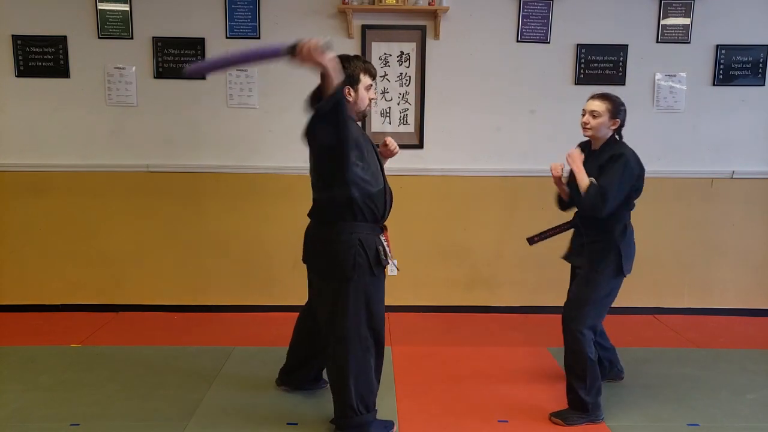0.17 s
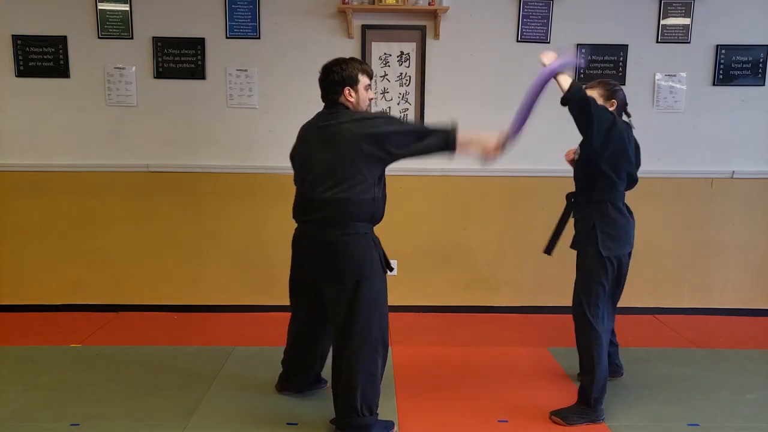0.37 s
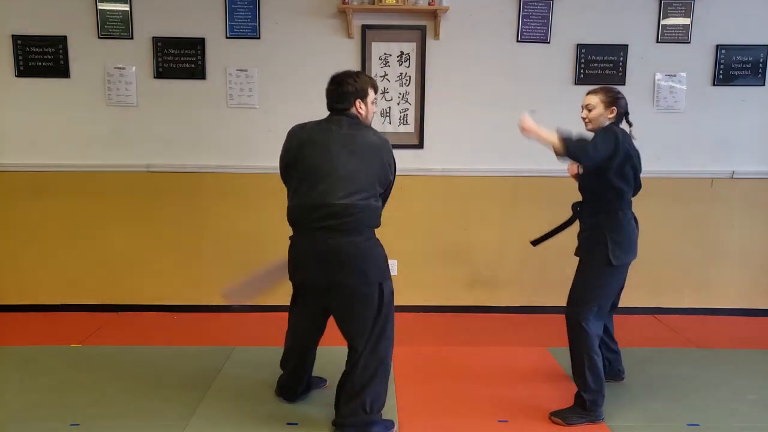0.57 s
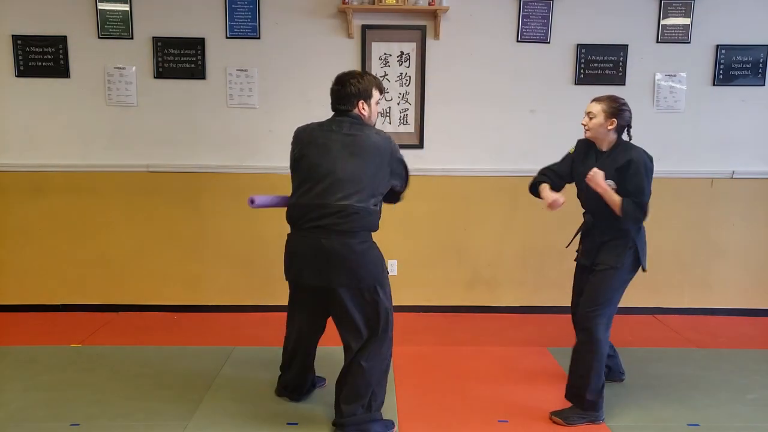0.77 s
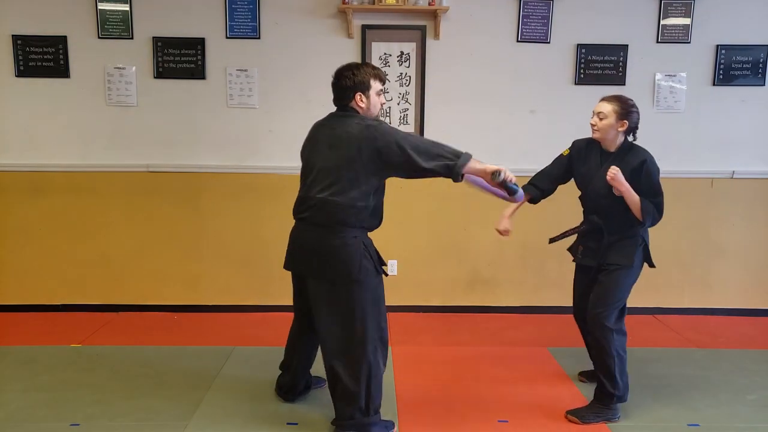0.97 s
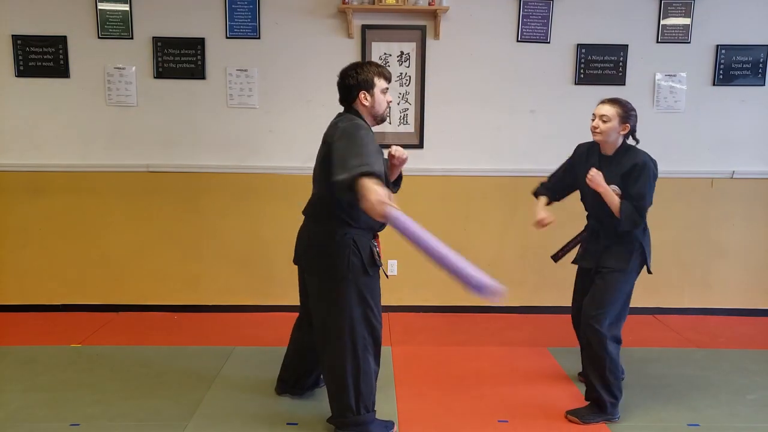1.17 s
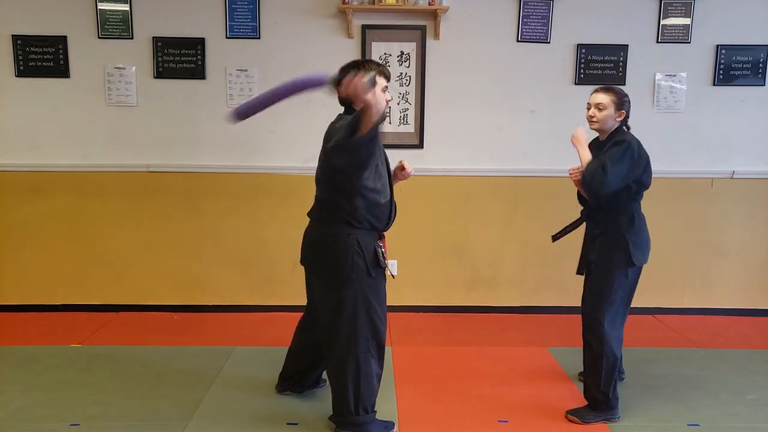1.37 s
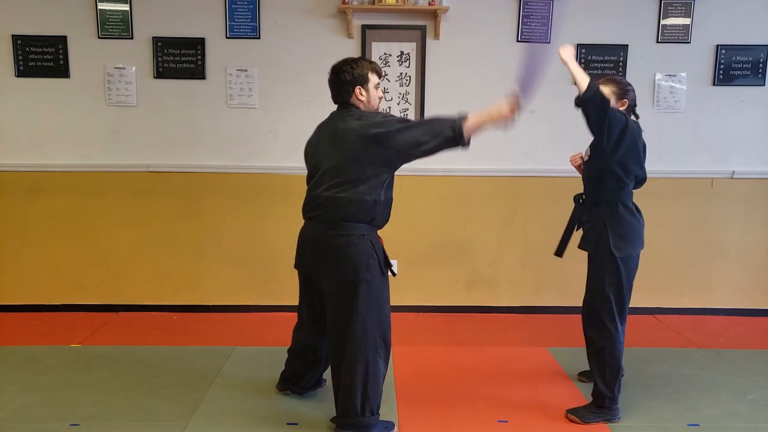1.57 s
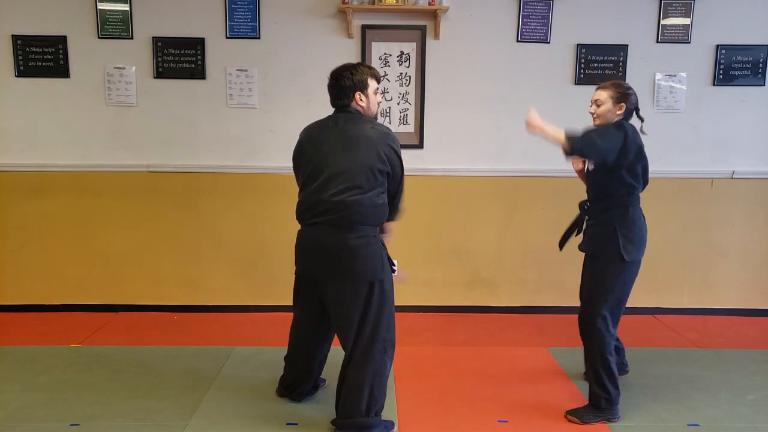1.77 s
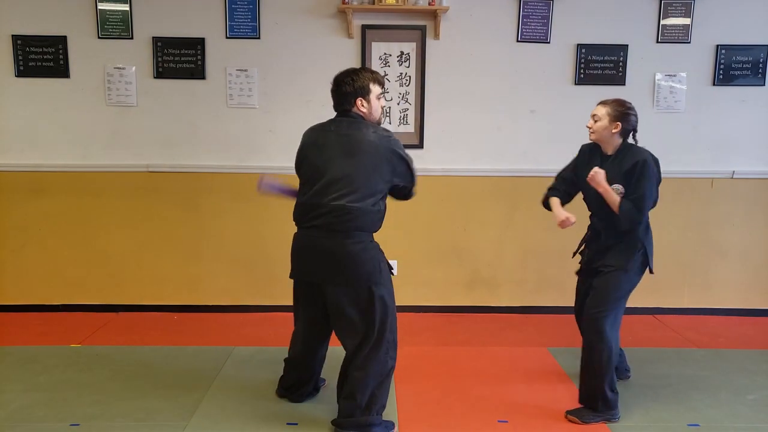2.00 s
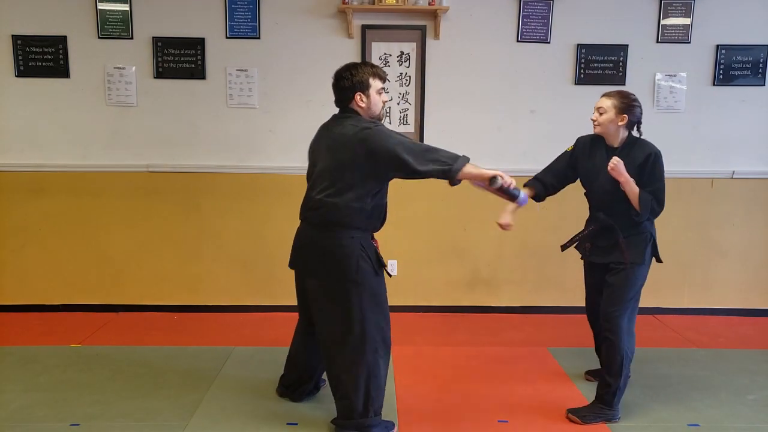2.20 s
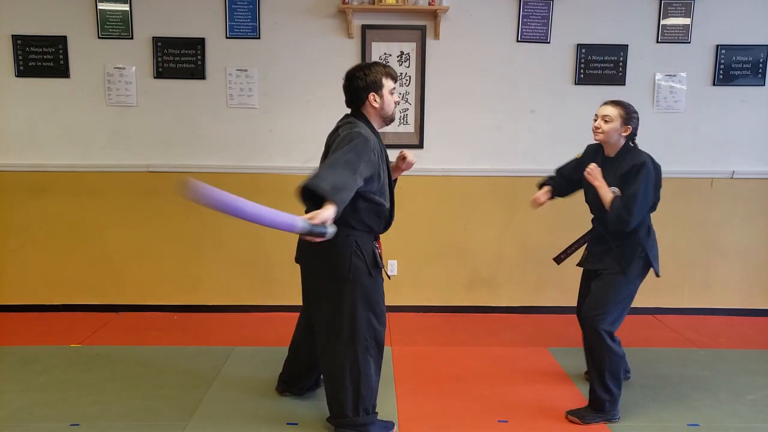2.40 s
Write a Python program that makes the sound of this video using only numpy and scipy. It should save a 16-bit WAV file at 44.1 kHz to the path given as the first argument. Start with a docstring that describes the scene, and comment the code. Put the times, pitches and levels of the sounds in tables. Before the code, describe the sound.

Sharp, hollow smacks of a foam tube on sleeved forearms, with soft swishes and room echo

```python
"""A foam noodle smacks blocking forearms in a large matted training room, a few metres from the microphones.
The tail of a first smack opens over steady hiss and a wavering rumble; sleeve and noodle swish between
blows. A smack at half a second leads to two light taps, then come a smack, a tap, two quick smacks and
a last one. Each is a filtered click for the crack and decaying sines for the short hollow thud, thrown
back by echoes and a noise-made room; the swishes are grainy noise bursts."""
import sys
import numpy as np
from scipy import signal
from scipy.fft import rfft, irfft
from scipy.io import wavfile
from scipy.ndimage import uniform_filter1d

SR = 44100
rng = np.random.default_rng(int(sys.argv[2]) if len(sys.argv) > 2 else 0)


def generate_wav(sig):
    """Save sig (samples, or channels by samples) to the path in sys.argv[1] as 16-bit PCM at SR."""
    pcm = np.round(np.clip(np.atleast_2d(sig).T, -1, 1) * 32767).astype(np.int16)
    wavfile.write(sys.argv[1], SR, pcm)


def voltage_ratio(level):
    """Linear amplitude factor for a level in decibels (scalar or array-like)."""
    return 10 ** (np.asarray(level, float) / 20)


N = 107736  # length in samples


def evened(x):
    """Scales a sound to an rms of one."""
    return x / np.sqrt(np.mean(x ** 2) + 1e-20)


def read(points, hz):
    """Reads a curve of (Hz, value) points, straight between them on a log frequency axis."""
    f, value = np.transpose(points)
    return np.interp(np.log(hz + 1), np.log(f + 1), value)


def shaped(x, gain):
    """Filters x by a gain that is a function of Hz."""
    spectrum = rfft(x) * gain(np.fft.rfftfreq(x.shape[-1], 1 / SR))
    return irfft(spectrum, x.shape[-1])


def paired(a, b):
    """Mixes two independent noises into left and right, alike in the bass and the top, looser between."""
    # Likeness of left and right. Each row: frequency in Hz, left-right correlation.
    likeness = [(60, .98), (150, .98), (380, .88), (950, .45), (2400, .1), (5000, -.25), (7300, -.25),
                (8000, .87), (11000, .75), (15000, .5)]

    def shared(hz):
        return np.clip(read(likeness, hz), -1, 1)

    right = shaped(a, shared) + shaped(b, lambda hz: np.sqrt(1 - shared(hz) ** 2))
    return np.array([a, right])


def floor():
    """Steady room noise and hiss, and a low rumble that wavers as feet shift on the mats."""
    # Spectrum of room noise and hiss. Each row: frequency in Hz, relative density in dB per Hz.
    hiss_curve = [(15, -4), (30, 9.5), (70, -5), (200, -2), (300, -1.5), (370, -15.5), (1000, -25),
                  (3400, -40), (5000, -24.5), (7300, -17.5), (8600, -36.5), (14800, -18), (16500, -26.5),
                  (17000, -51.5)]
    # Swell of the rumble ahead of the microphones' bass cut. Each row: time in seconds, rms level in dB.
    rumble_levels = [(0.0, -48), (0.05, -54), (0.22, -50), (0.49, -43.5), (0.52, -39), (0.67, -26),
                     (0.8, -74), (1.03, -54), (1.11, -27), (1.14, -33), (1.19, -44), (1.71, -64.5),
                     (1.76, -42), (1.81, -33), (1.83, -63), (2.26, -58.5), (2.33, -44.5), (2.44, -43)]
    hiss_db, rumble_hz = -61.5, 68.5  # the rumble's low-pass halves amplitude at rumble_hz
    a, b, c = rng.standard_normal((3, N))
    hiss = evened(shaped(paired(a, b), lambda hz: voltage_ratio(read(hiss_curve, hz))))
    rumble = evened(shaped(c, lambda hz: (hz > 10) / (1 + (hz / rumble_hz) ** 4)))
    rumble_db = np.interp(np.arange(N) / SR, *np.transpose(rumble_levels))
    return voltage_ratio(hiss_db) * hiss + voltage_ratio(rumble_db) * rumble


def causal(db):
    """A minimum-phase click with the spectrum db, which starts at once."""
    log = np.log(voltage_ratio(np.r_[db, db[-2:0:-1]]))
    return np.fft.ifft(np.exp(log - 1j * signal.hilbert(log).imag)).real


def crack(t):
    """The sharp onset of the blow: one click, strongest in the treble."""
    # Spectrum of the crack. Each row: frequency in Hz, relative level in dB.
    crack_curve = [(600, -34.5), (1500, -38), (2500, 5.5), (5000, 19.5), (7500, 16.5), (8600, 5),
                   (11000, 12.5), (15000, 13.5), (16500, -8), (17500, -41)]
    return -causal(read(crack_curve, np.fft.rfftfreq(len(t), 1 / SR)))


def ring(modes, pitch, t):
    """Sum of sine modes that start together and die exponentially."""
    return -sum(voltage_ratio(db - 60 * t / t60) * np.sin(2 * np.pi * hz * pitch * t) for hz, db, t60 in modes)


def thud(pitch, t):
    """Low ring of arm and sleeve."""
    # Modes of the thud. Each row: frequency in Hz at pitch 1, relative level in dB, t60 in seconds.
    thud_modes = [(100, -27, 0.021), (196.8, -3, 0.038), (317, -1, 0.019)]
    return ring(thud_modes, pitch, t)


def slap(t):
    """Higher, very short ring of the foam skin."""
    # Modes of the slap. Each row: frequency in Hz ahead of the pitch factor, relative dB, t60 in seconds.
    slap_modes = [(781, 2, 0.0048), (1042, -4.5, 0.0027), (1329, -1, 0.0057), (1667, 0, 0.0072),
                  (2012, -19.5, 0.012)]
    return ring(slap_modes, 0.9305, t)


def knock(knock_hz, t):
    """Hollow ring of the tube."""
    # Modes of the knock. Each row: multiple of the knock frequency, relative level in dB, t60 in seconds.
    knock_modes = [(1, 0, .035), (1.38, -10, .02)]
    return ring(knock_modes, knock_hz, t)


def spit(t):
    """Squeezed air: two channels of dying noise that smear the crack just after the contact."""
    start_s, t60, level_db = 0.0002, 0.08, -23.5
    noise = rng.standard_normal((2, len(t)))
    return voltage_ratio(level_db - 60 * t / t60) * noise * (t > start_s)


def echoes():
    """First bounces off floor and walls: single taps of random sign, placed apart for each channel."""
    # Bounces. Each row: usual delay in seconds, level in dB.
    bounces = [(.003, 2), (.0072, -4.5), (.0092, -2.5), (0.0149, -6.5), (0.019, -7.5), (.027, -10.5)]
    taps = np.zeros((2, SR))
    for lag, db in bounces:
        for side in taps:
            at = round(lag * rng.uniform(.93, 1.07) * SR)
            side[at] = voltage_ratio(db) * rng.choice([-1, 1])
    return taps


def room():
    """Sparse taps of random sign, each band dying at its own speed; low standing waves stand out."""
    # Decay of the room. Each row: frequency in Hz, t60 in seconds.
    decay = [(80, 0.63), (210, 0.77), (560, 0.44), (1470, 0.4), (3880, 0.55), (10200, 0.41)]
    # Standing waves. Each row: frequency in Hz, width in Hz, boost in dB.
    standing_waves = [(95, 4.7, -1.5), (157, 5.5, 3.5), (199.8, 8, 1.5), (269.4, 6.8, 5.5), (390.4, 34, 1)]
    rise_s, early_db, early_s = 0.0038, 3, 0.022
    taps = np.zeros((2, SR))
    at = np.arange(0, SR - 10, 10) + rng.integers(0, 10, (2, SR // 10 - 1))
    np.put_along_axis(taps, at, rng.choice([-1., 1.], at.shape), 1)
    hz, t, z = signal.stft(taps, SR, nperseg=512)
    dying = z * voltage_ratio(-60 * t / read(decay, hz)[:, None])
    tail = signal.istft(dying, SR, nperseg=512)[1][:, :SR]

    def resonance(f):
        return 1 + sum((voltage_ratio(db) - 1) / (1 + 2j * (f - mode_hz) / width)
                       for mode_hz, width, db in standing_waves)

    tail = shaped(np.pad(tail, ((0, 0), (0, SR))), resonance)[:, :SR]
    s = np.arange(SR) / SR
    rise = 1 - np.exp(-(s / rise_s) ** 2)
    near_walls = voltage_ratio(early_db * np.exp(-s / early_s))  # they crowd the start of the tail
    tail = tail * rise * near_walls
    return tail / np.linalg.norm(tail[0])


def through(x, space):
    """Plays one sound into a two-channel space."""
    return signal.fftconvolve(x[None], paired(*space), axes=1)


def smack(s, crack_db, thud_db, knock_db, slap_db, pitch, knock_hz):
    """A crack, a spit of squeezed air and the short ring of foam and arm, then echoes and room."""
    room_db, echo_crack_db, knock_wet_db = 9, -6, -4
    direct_crack_db, direct_body_db = -7, 1
    t = np.arange(4096) / SR
    click = voltage_ratio(crack_db) * crack(t)
    hollow = voltage_ratio(knock_db) * knock(knock_hz, t)
    body = voltage_ratio(thud_db) * thud(pitch, t) + voltage_ratio(slap_db) * slap(t)
    body = body + voltage_ratio(knock_wet_db) * hollow
    wet = through(click + body, voltage_ratio(room_db) * room())
    wet += through(voltage_ratio(echo_crack_db) * click + body, echoes())
    # the tube beams its knock at the microphones; the arm shades the crack
    direct = voltage_ratio(direct_crack_db) * click + voltage_ratio(direct_body_db) * body + hollow
    wet[:, :len(t)] += direct + through(click, spit(t))[:, :len(t)]
    lead = SR // 5  # room for a blow that lands before the start
    out = np.zeros((2, N + lead + 2 * SR))
    at = lead + round(s * SR)
    out[:, at:at + wet.shape[1]] = wet
    return out[:, lead:lead + N]


def swishes():
    """Grainy bursts of cloth and air noise that swell, pass and hang in the room."""
    # Swishes of sleeve and noodle. Each row: peak in seconds, rise in seconds, level in dB,
    # brightness in dB per octave.
    swish_rows = [(.2, 0.067, -67.5, -2), (.39, 0.18, -72, -3), (.52, 0.017, -57.5, 10),
                  (0.747, 0.034, -44, -3), (.88, 0.063, -43.5, -6), (0.929, 0.05, -60, -2.5),
                  (1.04, 0.037, -58, -4.5), (1.074, 0.044, -56.5, 1), (1.299, 0.16, -69, 11.5),
                  (1.498, 0.057, -67, 12.5), (1.741, 0.077, -72, 0), (2.028, 0.015, -88, -26),
                  (2.158, 0.044, -52, -4.5), (2.32, 0.023, -65.5, 3)]
    # Their common spectrum. Each row: frequency in Hz, relative density in dB per Hz.
    swish_curve = [(180, -33), (300, -18), (877, -11.5), (1150, -10), (1770, -16.5), (6780, -12),
                   (8440, -20.5), (15200, -15.5), (16500, -39)]
    grain_db, wet_db = 0.5, -2
    t, out = np.arange(N) / SR, np.zeros(N)
    for s, rise, db, tilt_db in swish_rows:
        def colour(hz):
            return voltage_ratio(read(swish_curve, hz) + tilt_db * np.log2((hz + 1) / 2000))

        noise = shaped(rng.standard_normal(N), colour)
        grain = voltage_ratio(grain_db * evened(uniform_filter1d(rng.standard_normal(N), 150)))
        swell = np.exp(-((t - s) / rise) ** 2)
        out += voltage_ratio(db) * swell * evened(noise * grain)
    return out + voltage_ratio(wet_db) * through(out, room())[:, :N]


def scene():
    """Smacks, light taps and swishes over the noise of the room."""
    # Smacks of the noodle on forearms. Each row: start in seconds, then crack, thud, hollow knock and slap
    # in relative dB, thud pitch (1 = usual), knock frequency in Hz.
    smack_rows = [(-.07, -20.5, -19.5, -27.5, -19.5, 0.78, 430), (0.53, -21, -21.5, -23.5, -20, 1.274, 430),
                  (1.0966, -22.5, -19.5, -26.5, -21, 1.11, 423),
                  (1.76, -24.5, -26.5, -20, -23.5, 1.12, 528), (1.876, -30.5, -34, -28.5, -28, 1.05, 407),
                  (2.3308, -22.5, -23, -20, -21, 0.95, 437)]
    # Light taps of the noodle on cloth. Each row: the same columns as a smack.
    tap_rows = [(0.7204, -60, -37, -40.5, -42.5, 0.84, 505), (0.8361, -55, -42, -53, -50.5, 0.73, 887),
                (1.3717, -49.5, -61.5, -48, -50, 0.87, 665)]
    blows = sum(smack(*row) for row in smack_rows + tap_rows)
    return blows + swishes() + floor()


def roll_off(x):
    """The treble ends steeply here."""
    return signal.sosfilt(signal.butter(12, 16800, fs=SR, output="sos"), x)


def record(dry):
    """The microphones cut the deep bass; the left is louder below the treble, the right a little above."""
    # Balance of the microphones. Each row: frequency in Hz, left minus right in dB.
    balance = [(30, 1.5), (300, 3), (7300, 2.6), (8000, -1.2), (15000, -1.2)]
    bass_cut = signal.butter(2, 91, "high", fs=SR, output="sos")  # Hz
    left, right = signal.sosfilt(bass_cut, dry)
    left = shaped(left, lambda hz: voltage_ratio(read(balance, hz) / 2))
    right = shaped(right, lambda hz: voltage_ratio(-read(balance, hz) / 2))
    return roll_off(np.array([left, right]))


dry = scene()
out = record(dry)
generate_wav(out)
```